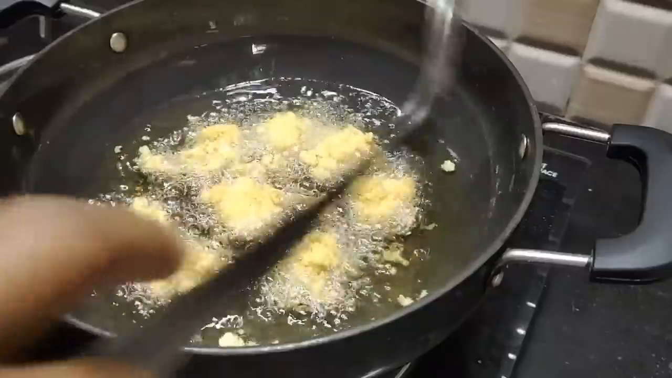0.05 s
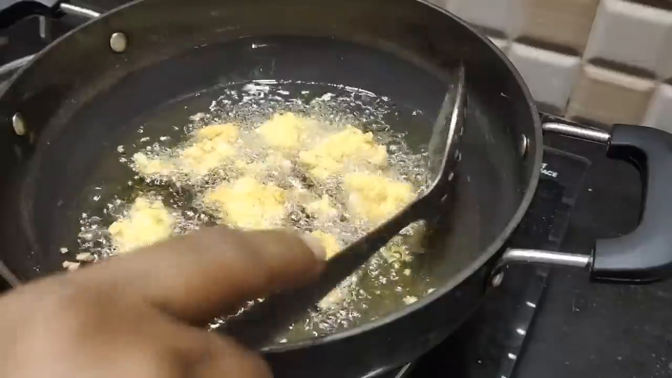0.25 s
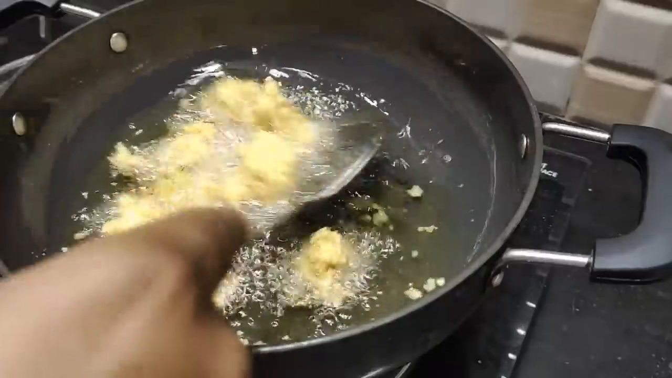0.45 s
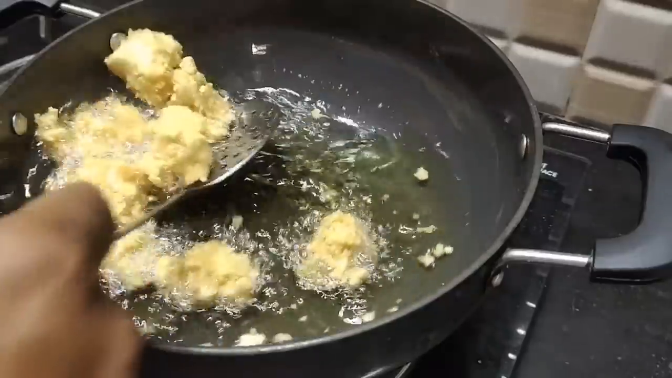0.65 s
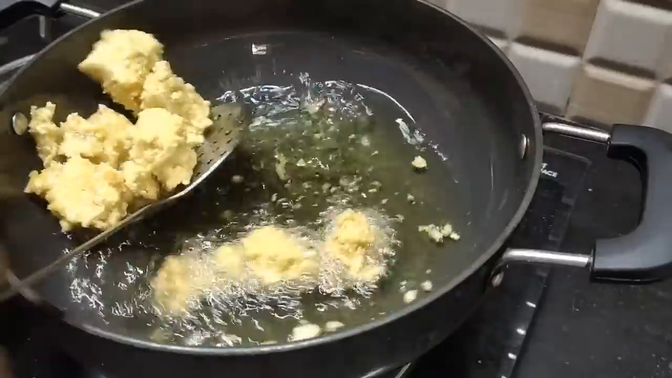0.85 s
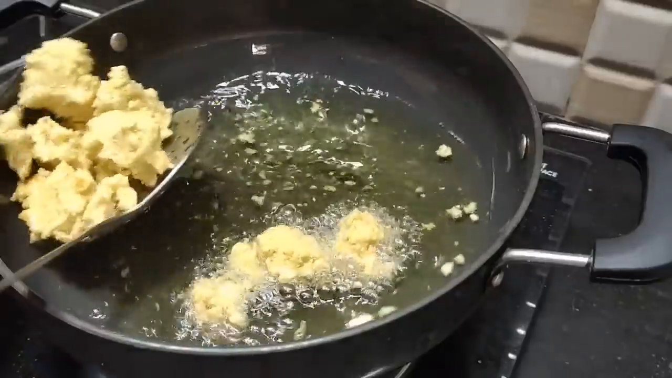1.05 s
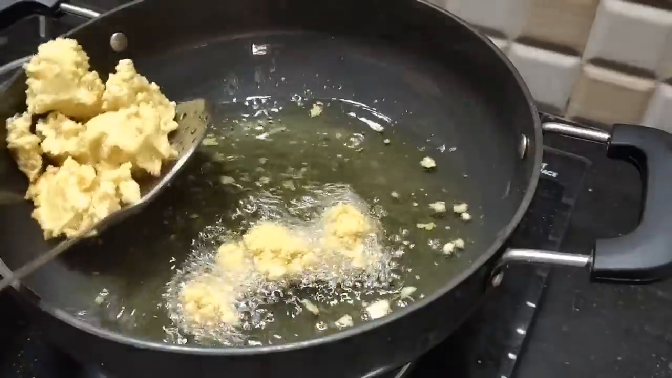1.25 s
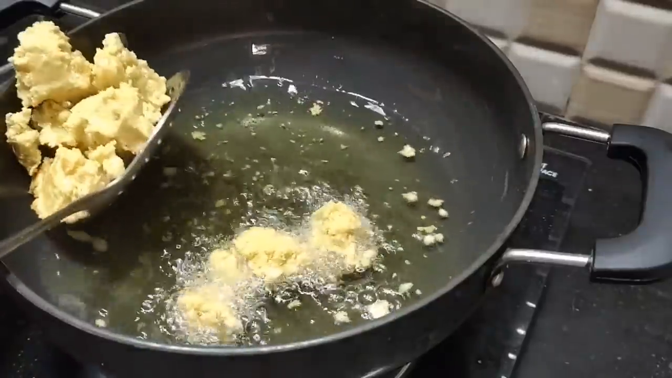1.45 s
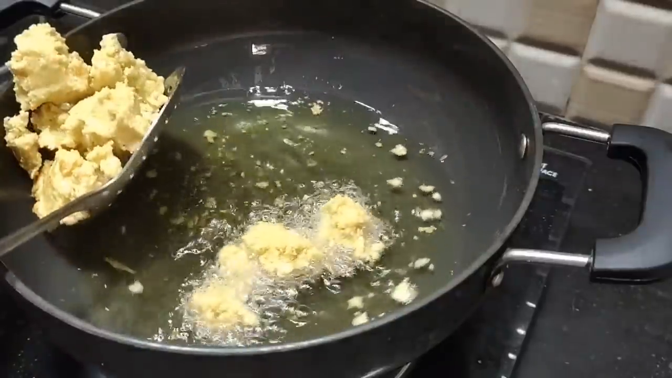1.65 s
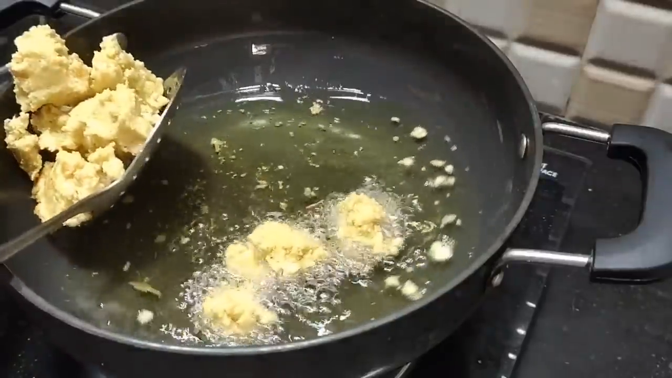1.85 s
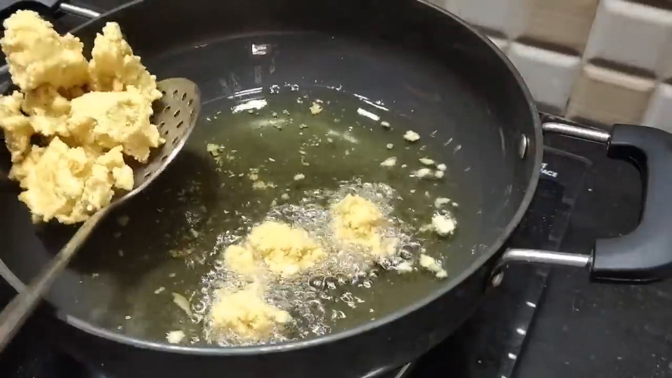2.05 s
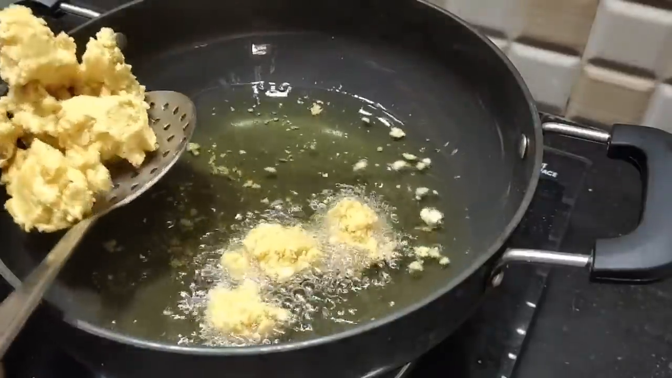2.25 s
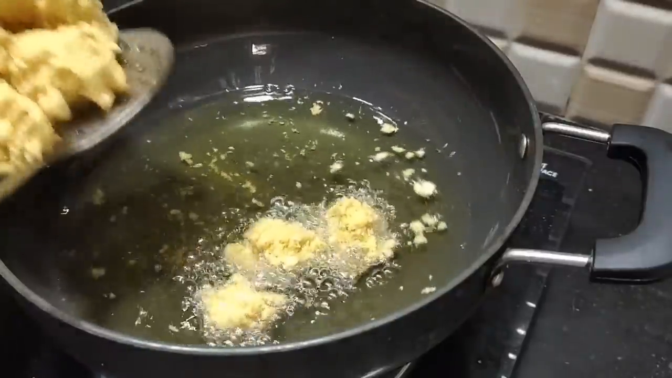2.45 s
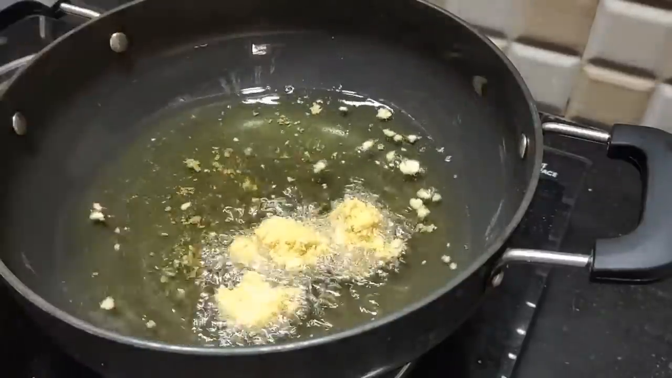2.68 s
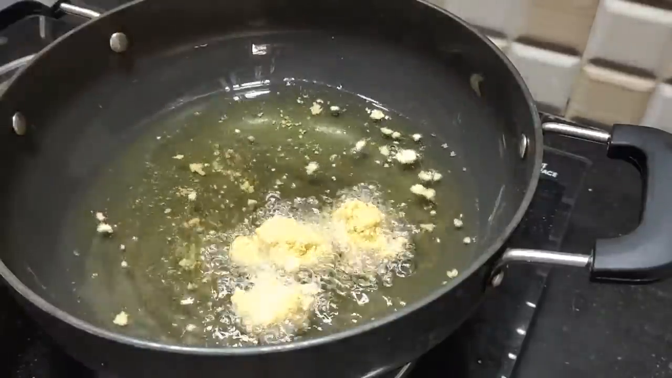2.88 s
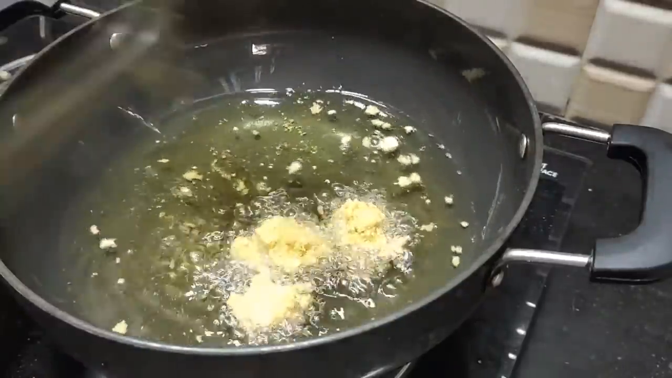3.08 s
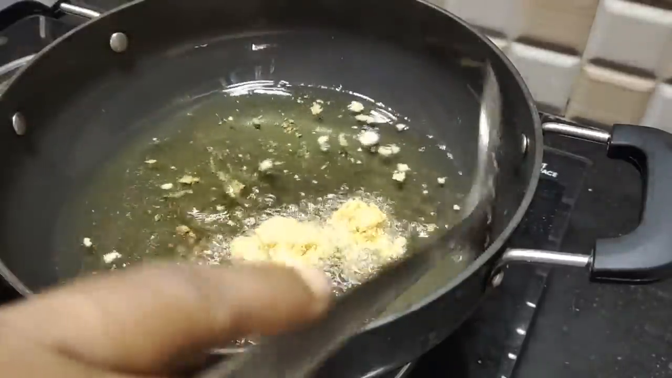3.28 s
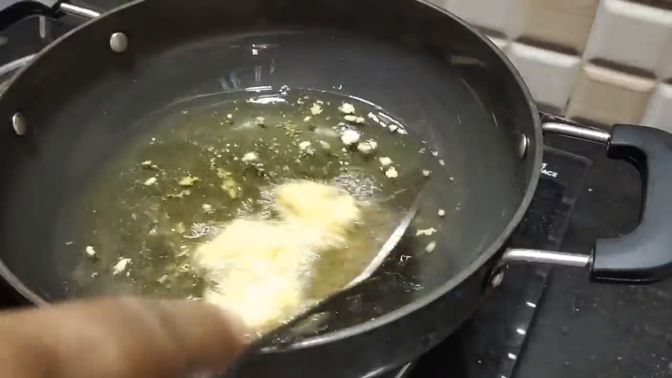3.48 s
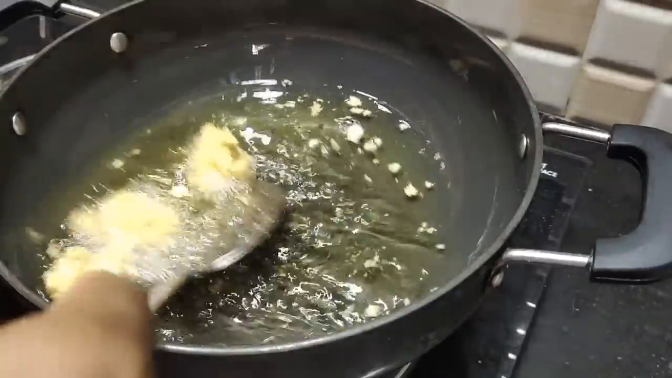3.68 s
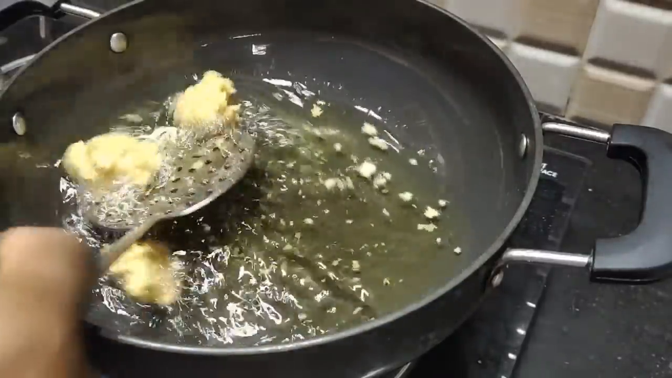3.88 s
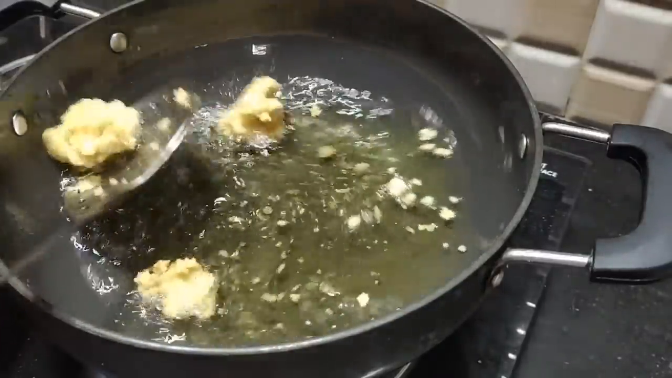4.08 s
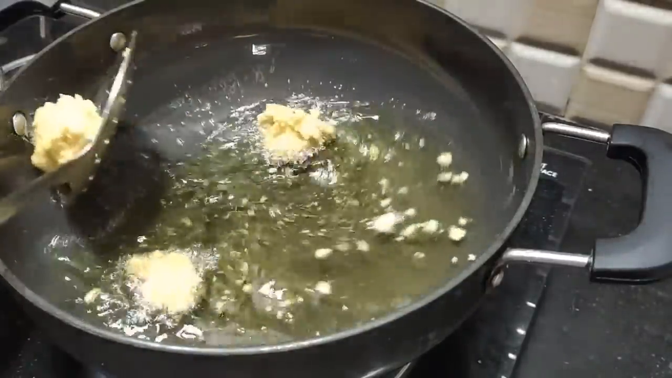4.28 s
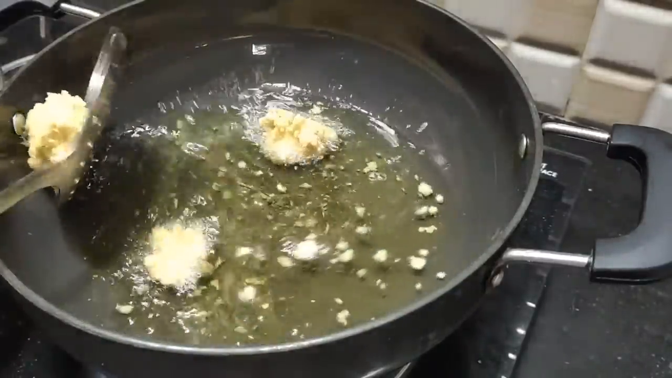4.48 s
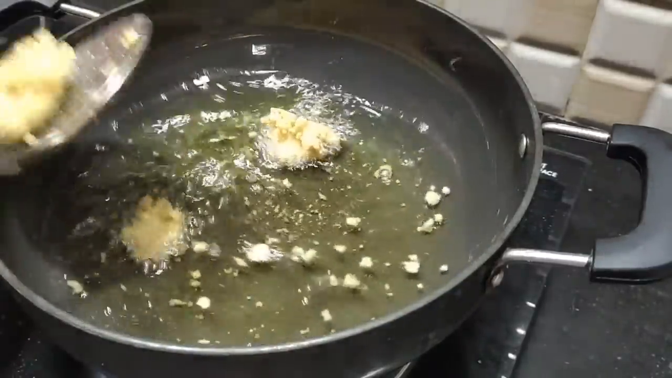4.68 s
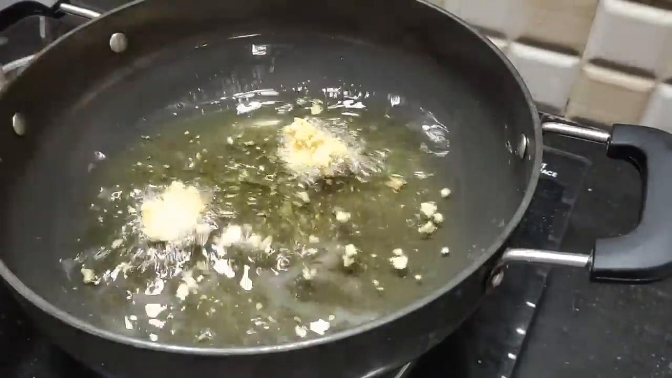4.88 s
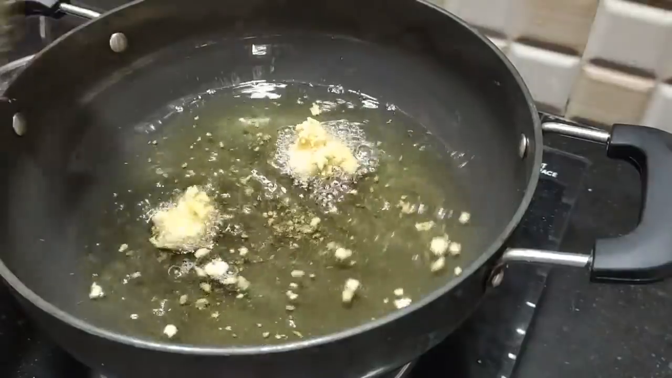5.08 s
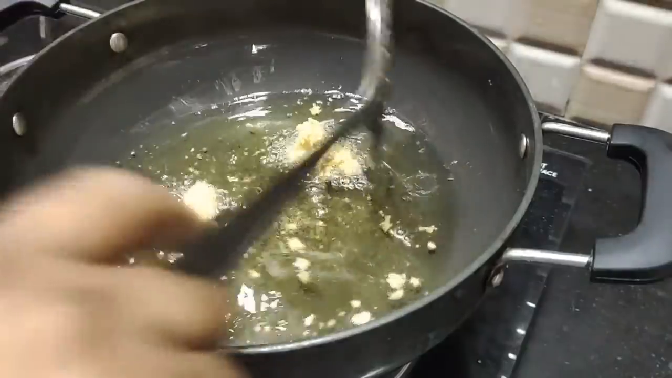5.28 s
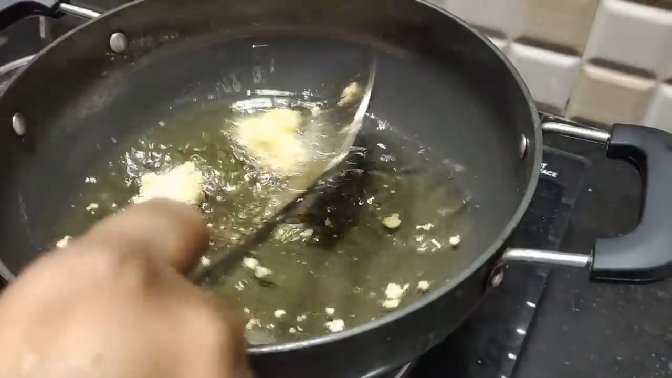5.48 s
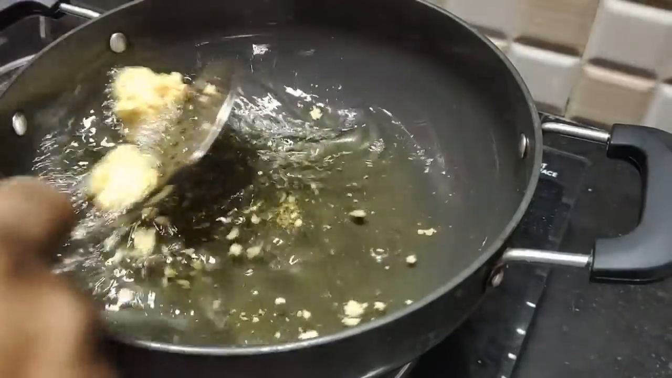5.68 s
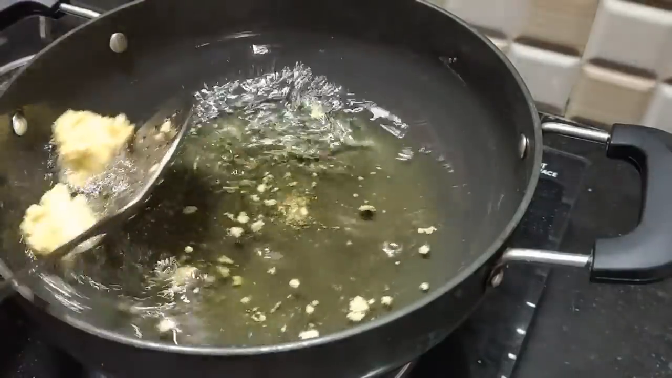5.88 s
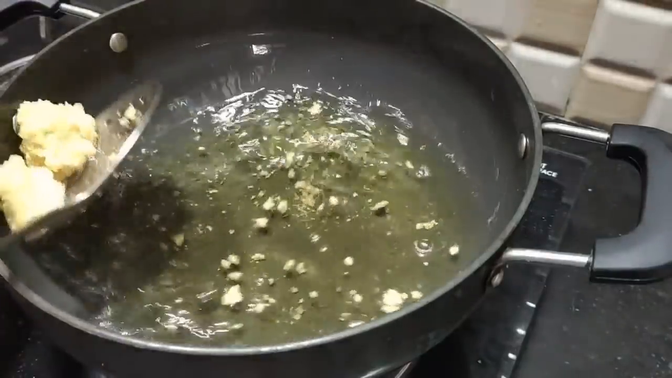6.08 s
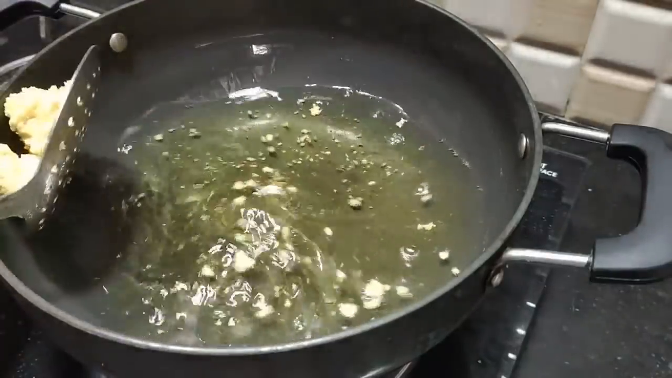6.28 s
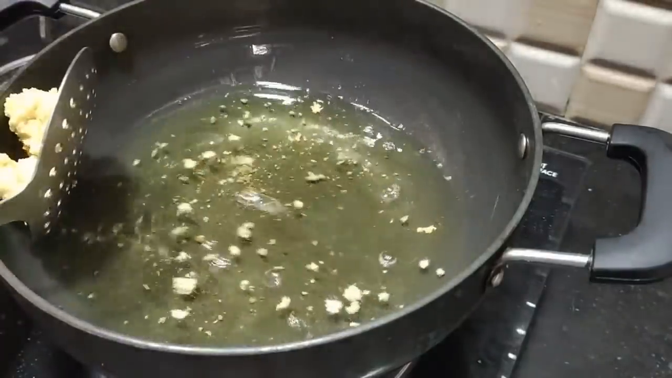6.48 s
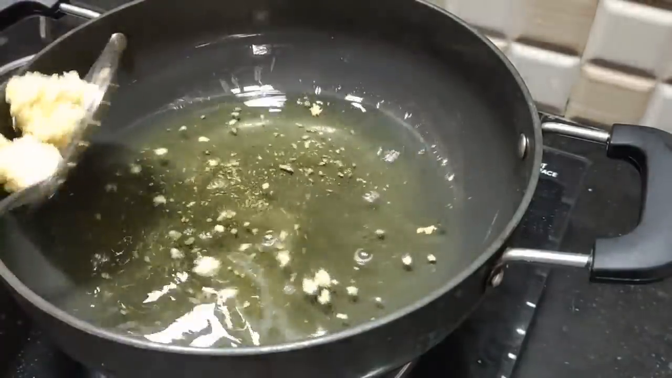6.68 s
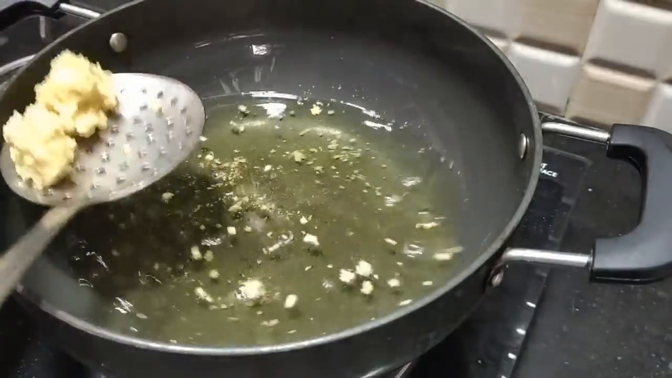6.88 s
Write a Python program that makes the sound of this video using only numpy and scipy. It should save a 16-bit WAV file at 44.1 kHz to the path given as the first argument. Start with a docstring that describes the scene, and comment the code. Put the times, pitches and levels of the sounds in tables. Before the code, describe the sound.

Irregular scrapes, judders and sharp clanks of a steel spoon in a pan of faintly sizzling oil.

```python
"""In a small tiled kitchen, a slotted steel spoon scoops fried food out of a nonstick pan of hot oil.
The spoon knocks on the pan and rings, grinds over the coating, and judders where it sticks and slips.
The pan booms under it, and tiny bursting steam bubbles make the oil sizzle faintly.
The hard walls give these sounds a short echo, over a low, steady hush."""
import sys
import numpy as np
from scipy import signal
from scipy.fft import rfft, irfft
from scipy.io import wavfile
from scipy.ndimage import uniform_filter1d

SR = 44100
rng = np.random.default_rng(int(sys.argv[2]) if len(sys.argv) > 2 else 0)


def master_out(mix):
    """Clip the mix to full scale and print it as 16-bit PCM to the path in sys.argv[1]."""
    frames = np.transpose(np.atleast_2d(mix))
    ceiling = np.clip(frames, -1, 1)
    pcm = np.round(ceiling * 32767).astype(np.int16)
    wavfile.write(sys.argv[1], SR, pcm)


N = 306054
T = np.arange(N) / SR

# The spoon's ringing tones. Each row: pitch in Hz, level in dB, seconds to fade by 60 dB before
# damping, left over right in dB.
SPOON_TONES = [(722, -17, .3, 0), (860, -23, .25, 0), (1140, -23, .22, 0), (1870, -12, .22, -1),
               (1948, -10, .3, -1), (2398, -14, .15, 0), (2650, -17, .18, 0), (3435, -19, .22, 0),
               (3740, -14, .3, 0), (4340, -20, .22, 0), (4690, -24, .3, 0), (5050, -15, .25, 8),
               (5085, -12, .25, 10), (5420, -17, .17, 4), (6320, -17, .25, 0), (7117, 2, .18, -4),
               (7168, -5, .26, -3), (7600, -11, .3, 0), (7760, -17, .18, 0), (8366, -5, .12, -2),
               (8915, -21, .25, 0), (9770, -15, .18, 0), (10020, -12, .2, 0), (10660, -16, .25, 2),
               (11400, -25, .2, 2), (12625, -9, .17, 9), (12980, -15, .22, 6), (13870, -23, .25, 3)]
# Pushes of the spoon over the coating. Each row: start in seconds, length in seconds, level in dB,
# its change by the end in dB, treble bite in dB, pan boom in dB, contact pitch in Hz, its lift in dB.
PUSHES = [(0.029, 0.088, -31, -3, -1.5, 10.5, 2440, -3.5),
          (0.314, 0.34, -61.5, -0.5, -26.5, 8, 2100, -28.5), (0.579, 0.13, -42.5, 6, -3, -3, 2850, 4.5),
          (0.716, 0.33, -57.5, -4.5, -34, 4.5, 2330, 6.5), (1.87, 0.093, -44, -0.5, -15.5, -4.5, 2110, 7),
          (2.005, 0.38, -49.5, -9.5, -26, 1.5, 1940, -4), (2.314, 0.1, -37.5, -12.5, -0.5, -14, 1960, 8.5),
          (2.666, 0.13, -31.5, -7.5, -3, 2, 2360, -1.5), (2.793, 0.069, -26, -13, -0.5, 2.5, 2430, -1.5),
          (2.882, 0.17, -39.5, -6.5, -26, -18, 2250, -8), (3.098, 0.15, -37, -23.5, -18, -13.5, 2220, -5),
          (3.454, 0.14, -28.5, -8.5, -5, -1.5, 2180, 0.5), (3.614, 0.11, -57.5, -5, -16, -11.5, 1960, 15),
          (4.033, 0.016, -51, -2.5, -24, 8, 2040, 5), (4.185, 0.1, -52, -4, -7.5, 9.5, 1780, 2),
          (4.389, 0.25, -50.5, 5.5, -10.5, -3.5, 1830, 6), (4.788, 0.13, -43, -0.5, -12, 4, 2500, 0),
          (4.968, 0.11, -49.5, -1.5, -13, 6.5, 2140, -29.5),
          (5.155, 0.21, -42, -12.5, -11, 12.5, 2710, -0.5), (5.643, 0.094, -39, -4.5, -10.5, -13, 2910, -2),
          (5.751, 0.3, -45.5, -3.5, -25, 1.5, 1910, -11.5), (6.335, 0.11, -53, 5, -26, 2, 1910, -14),
          (6.37, 0.17, -40, -12.5, -12, -14, 2640, 3), (6.538, 0.12, -52, 0.5, -12.5, -6, 1830, 11)]


def knocks(level_db=-6, ring_db=9, clank_db=3, boom_db=17, crack_s=0.008, attack_s=0.0023):
    """Each blow on the pan gives a crack, a short clank, a low boom and the ring of the spoon."""
    # Each row: start in seconds, level in dB, clank in dB, hard edge in dB, ring in dB, left over right
    # in dB, clank pitch in Hz, seconds for the clank to fade by 60 dB, favoured spoon pitch in Hz.
    blows = [(0.227, -30, -0.5, -11.5, -8.5, 1, 2650, 0.18, 2400),
             (1.3418, -48.5, 1.5, -22.5, -16, 0.5, 2070, 0.25, 1840),
             (2.0891, -48.5, 11.5, -8, 4, 0.5, 1910, 0.078, 5085),
             (2.25, -48, 5.5, -12, -8.5, -4, 1850, 0.36, 2650),
             (2.3028, -37, 0.5, -25, -7, -0.5, 1800, 0.12, 1890),
             (2.389, -40.5, -3, -75, -3.5, 5, 1940, 0.094, 1948),
             (2.6914, -19, -9, -10.5, -9.5, -2, 2950, 0.32, 10020),
             (3.02, -38.5, -10, -23, -13, 3, 2236, 0.097, 5200),
             (3.11, -40.5, -4.5, -22, -21, 0, 2010, 0.06, 2630),
             (3.1286, -31, -29, -20.5, -27, 8.5, 1850, 0.068, 5085),
             (3.24, -20, -15.5, -1, -8, -0.5, 1690, 0.11, 3740),
             (3.2539, -19, -12, -18.5, -4, 1.5, 2430, 0.38, 5000),
             (4.405, -59, 13.5, -20, -10, 4, 1826, 0.09, 1920),
             (4.567, -13.5, -8.5, -8.5, -4, -4, 2060, 0.075, 5400),
             (4.634, -9.5, -13, -19.5, -17.5, 1.5, 1883, 0.096, 3740),
             (4.9823, -43.5, 1.5, -14, -10.5, -7, 2850, 0.025, 5200),
             (5.3369, -11.5, -1.5, -11.5, -17.5, -1.5, 2413, 0.042, 720),
             (6.3317, -62, 19, -17, -24, 4, 1950, 0.075, 1900),
             (6.5604, -54, 16, -6, -14, -1.5, 2420, 0.16, 1900),
             (6.7144, -27, -10.5, -17, -2.5, 0, 2030, 0.24, 1930)]
    # The pan's clank. Each row: frequency in Hz, level in dB.
    clank_spectrum = [(35, -61), (60, -32), (193, -12.5), (308, -1.5), (398, 1.5), (715, 4.5), (1620, -4),
                      (1910, -1.5), (2140, -7), (2350, 2), (5590, -20), (7400, -9), (10800, -9),
                      (13000, -11.5), (16000, -20.5)]
    out, force, t = np.zeros((2, N)), np.zeros(N), T[:SR // 3]
    for start, db, clank, edge, ring, side, hz, fade_s, favoured_hz in blows:
        noise = rng.standard_normal((2, len(t)))
        body, treble, top = three_bands(colour(noise, clank_spectrum, ripple_db=2), 4230, 8750)
        body = body + amp(-8) * resonate(noise, hz, width_hz=560)
        fall = amp(-60 * t / fade_s) + np.exp(-t / crack_s)
        hit = fall * (amp(clank + clank_db) * body + amp(-3) * treble + amp(edge + 3) * top)
        # the spot that is struck lifts nearby tones by up to 5 dB
        octaves_away = np.log2(np.transpose(SPOON_TONES)[0] / favoured_hz)
        weights = amp(5 * np.exp(-(octaves_away / 0.24) ** 2))
        hit += amp(ring + ring_db) * spoon_ring(weights, damping=2.17)
        hit *= 1 - np.exp(-t / attack_s)  # the blow takes a moment to spread through the metal
        add(out, start - .001, amp(db + level_db) * balance(side) * hit)
        add(force, start, amp(db + clank + boom_db) * np.hanning(20))
    return out + pan_boom(force)


def scrapes(grind_db=-0.5, contact_db=-7.5, rasp_db=-2, top_db=-15, ring_db=-9, hard_bite_db=-38):
    """The spoon's edge catches on grains of the coating; each catch rattles the pan and rings the spoon."""
    catches = clicks(per_s=1800, spread_db=4) * amp(1.5 * wobble(500))
    # the point of contact travels, so the pan's many tones take turns
    rattle = flutter(scatter(catches, fade_s=0.023), depth_db=6, frames=12, bins=2)
    out = np.zeros((2, N))
    for start, length, db, change, bite, _, contact_hz, lift in PUSHES:
        pressure = amp(db) * push(start, length, change)
        span = (round(start * SR) + np.arange(len(pressure))) % N
        # each push holds the spoon differently, so other tones stand out
        weights = amp(2.8 * rng.standard_normal(len(SPOON_TONES)))
        weights *= (2000 / np.transpose(SPOON_TONES)[0]) ** 1.5
        ring = spoon_ring(weights, damping=3.2)
        ringing = unit(signal.fftconvolve(catches[None, span], ring, axes=1)[:, :len(span)])
        # The grinding. Each row: frequency in Hz, level in dB.
        grind_spectrum = [(59, -68.5), (100, -41.5), (206, -40), (266, -36), (442, -9), (872, -6),
                          (1390, -8.5), (1910, -20.5), (2130, -49.5), (2860, -15), (6020, -29.5),
                          (7450, -22), (13200, -53), (15000, -47.5), (16000, -59)]
        metal = colour(rattle[:, span], grind_spectrum, ripple_db=-0.5) + amp(ring_db) * ringing
        _, rasp, top = three_bands(metal, 4500, 9140)
        body = three_bands(metal, 1.86 * contact_hz, 9000)[0]  # a soft contact passes little treble
        contact = resonate(rattle[:, span], contact_hz, width_hz=680)
        body = amp(grind_db) * body + amp(contact_db + lift) * contact
        highest_db = bite + top_db + 0.57 * (db + bite - hard_bite_db)  # a harder bite is brighter
        add(out, start, pressure * (body + amp(bite + rasp_db) * rasp + amp(highest_db) * top))
    # cuts the deep bass below 150 Hz out of the scraping
    return signal.sosfilt(signal.butter(2, 150, "highpass", fs=SR, output="sos"), out)


def judders(level_db=-1.5, overtone_db=-28, pan_db=-8, drag_db=-7, thud_db=-21, waver=0.028):
    """The spoon sticks and slips, shaking pan and stove in bursts over the low rumble of dragging."""
    # Each row: time in seconds, level in dB, slips per second, length in seconds.
    bursts = [(0.049, -9, 275, 0.048), (0.114, -24.5, 298, 0.13), (0.192, -31, 294, 0.072),
              (0.583, -28, 316, 0.054), (0.615, -22, 294, 0.023), (0.656, -20, 269, 0.054),
              (2.696, -33, 284, 0.098), (2.809, -31.5, 315.6, 0.03), (3.257, -32, 332, 0.071),
              (3.414, -43, 299.5, 0.1), (3.516, -28.5, 305, 0.031), (4.263, -27, 272, 0.046),
              (4.565, -24.5, 300, 0.089), (4.847, -38.5, 289, 0.057), (5.028, -47, 335, 0.04),
              (5.181, -29, 278, 0.05), (5.236, -20.5, 283, 0.055), (5.304, -32.5, 292, 0.076),
              (5.669, -25.5, 271, 0.056), (5.773, -32.5, 276, 0.044), (5.885, -29.5, 271, 0.048),
              (6.259, -37, 300, 0.059)]
    # Each pair: frequency in Hz, level in dB.
    rumble_spectrum = [(30, -36), (60, -9), (110, -2.5), (180, -8), (260, 4), (330, 6.5), (420, -4),
                       (900, 1.5), (2000, -55.5)]
    thud_spectrum = [(25, -34.5), (70, -15.5), (105, 5), (170, 2), (230, -15), (400, 6.5), (700, 7.5),
                     (1000, -7.5), (2000, -45)]
    strength = np.zeros(N)
    for time, db, _, length in bursts:
        add(strength, time + 0.011 - length / 2, amp(db + level_db) * np.hanning(int(length * SR)))
    times, _, slip_hz, _ = np.transpose(bursts)
    rate = np.interp(T, times, slip_hz) * (1 + waver * wobble(400))
    phase = 2 * np.pi * np.cumsum(rate) / SR
    shake = strength * (np.sin(phase) + amp(overtone_db) * np.sin(2 * phase))
    rumble = unit(pan_boom(colour(rng.standard_normal(N), rumble_spectrum)))
    rumble *= amp(drag_db) * drag()
    # uneven slips also give a dull thud that lingers in the stove
    linger = np.exp(-T[:SR // 3] / 0.012)
    thud = colour(rng.standard_normal(N), thud_spectrum)
    thud *= amp(thud_db) * signal.oaconvolve(strength, linger / linger.sum())[:N]
    return (shake + amp(pan_db) * pan_boom(shake) + rumble + thud) * amp([[-1.7], [1.5]])


def push(start, length, change_db):
    """The pressure of one scrape builds, drifts and lets go."""
    t = start + T[:round((length + .12) * SR)]
    return swell(t, start, length, attack_s=0.032, release_s=0.028, change_db=change_db)


def drag():
    """The force on the pan: the weight of the loaded spoon, plus every push."""
    # The leaning spoon. Each row: time in seconds, rumble level in dB.
    lean = [(0, -37.5), (.5, -60), (1.3, -58), (1.6, -80.5), (2.6, -90), (3.2, -62), (3.9, -54.5),
            (4.35, -49), (5.55, -52), (6.25, -50), (6.94, -53.5)]
    force = amp(np.interp(T, *np.transpose(lean)))
    for start, length, db, change, _, boom, _, _ in PUSHES:
        add(force, start, amp(db + boom) * push(start, length, change))
    return force


def spoon_ring(weights, damping):
    """The steel rings with many tones at once; touching the pan damps them, so they fade sooner."""
    t = T[:SR // 3]
    phases = rng.random((len(SPOON_TONES), 1, 1)) + .3 * rng.random((len(SPOON_TONES), 2, 1))
    ring = np.zeros((2, len(t)))
    for (hz, db, fade_s, side), weight, phase in zip(SPOON_TONES, weights, phases):
        fall = amp(db - 60 * t * damping / fade_s)
        ring += weight * balance(side) * fall * np.sin(2 * np.pi * (hz * t + phase))
    return ring


def pan_boom(force):
    """A force sets the pan's low tones ringing."""
    # Each row: pitch in Hz, width in Hz, level in dB.
    pan_tones = [(287, 8.7, -7), (285.8, 9.8, -19), (323.7, 23, -1.5), (469.5, 21, -9), (712, 8.3, -17.5)]
    return sum(amp(db) * signal.lfilter(*signal.iirpeak(hz, hz / width, SR), force)
               for hz, width, db in pan_tones)


def oil(level_db=-9, pops_db=-7, simmer_db=-60):
    """Tiny steam bubbles burst among a few larger pops; the oil boils up when stirred, then settles."""
    # Each row: start in seconds, length in seconds, level in dB.
    stirs = [(1.88, 0.32, -59), (3.967, 0.26, -47), (4.449, 0.13, -38.5), (4.975, 0.16, -49),
             (5.85, 0.057, -53), (6.135, 0.11, -53.5), (6.556, 0.1, -51.5)]
    # The sizzle. Each row: frequency in Hz, level in dB.
    sizzle_spectrum = [(300, -16), (1500, -22), (4500, -16.5), (6500, -8), (8200, 1), (9500, -11),
                       (11500, -11.5), (13500, -10), (16000, -15.5)]
    fizz = scatter(clicks(per_s=6000, spread_db=1.8), fade_s=0.082)
    fizz = flutter(colour(fizz, sizzle_spectrum), depth_db=5)
    pops = scatter(clicks(per_s=70, spread_db=3), fade_s=0.042)
    pops = flutter(colour(pops, sizzle_spectrum), depth_db=8.5)
    stirred = sum(amp(db) * swell(T, start, length, attack_s=0.085, release_s=0.064)
                  for start, length, db in stirs)
    return (fizz + amp(pops_db) * pops) * amp(level_db) * (amp(simmer_db) + stirred)


def scatter(x, fade_s):
    """Quick echoes inside the pan reach left and right by different paths."""
    t = T[:2048]
    paths = rng.standard_normal((2, len(t))) * amp(-60 * t / fade_s)
    paths /= np.linalg.norm(paths, axis=1, keepdims=True)
    return signal.oaconvolve(x[None], paths, axes=1)[:, :N]


def kitchen(x, echo_db):
    """Hard walls add a dense tail of echoes that dies sooner in the treble."""
    # Each row: frequency in Hz, seconds to fade by 60 dB.
    fade_times = [(100, 1), (300, 0.48), (1000, 0.52), (2500, 0.46), (7000, 0.39), (14000, 0.38)]
    echoes = rng.standard_normal((2, SR)) * (rng.random((2, SR)) < .15)
    hz, t, bands = signal.stft(echoes, SR, nperseg=256)
    alike = .95 / (1 + (hz[:, None] / 650) ** 4)  # left and right nearly match in the bass
    bands[1] = alike * bands[0] + np.sqrt(1 - alike ** 2) * bands[1]
    bands *= amp(-60 * t / look_up(fade_times, hz)[:, None])
    tail = signal.istft(bands, SR, nperseg=256)[1][:, :SR]
    tail *= 1 - np.exp(-(T[:SR] / 0.0018) ** 2)  # the first echoes take a moment to arrive
    return x + amp(echo_db) * signal.fftconvolve(x, tail / np.linalg.norm(tail[0]), axes=1)[:, :N]


def hush(level_db=-83):
    """The low, steady background of the kitchen."""
    # Each row: frequency in Hz, level in dB.
    hush_spectrum = [(15, -58.5), (25, -23), (60, -24.5), (93, -1.5), (205, -29), (320, -20), (617, -24.5),
                     (831, -3), (1030, -28.5), (2730, -16), (4000, -20.5), (5200, -56.5), (8800, -120)]
    left, right, both = rng.standard_normal((3, N))
    return amp(level_db) * colour(np.array([left, right]) + 0.82 * both, hush_spectrum)


def amp(db):
    """Turns decibels into a gain."""
    return 10 ** (np.asarray(db) / 20)


def unit(x):
    """Scales a sound to an average (rms) level of 1."""
    return x / np.sqrt(np.mean(x ** 2) + 1e-20)


def balance(side_db):
    """Two gains that make the left side_db louder than the right."""
    return amp([[side_db / 2], [-side_db / 2]])


def look_up(table, hz):
    """Reads between a table's rows on a pitch-like (log) scale."""
    row_hz, values = np.transpose(table)
    return np.interp(np.log(hz + 1), np.log(row_hz + 1), values)


def add(mix, start_s, sound):
    """Mixes a sound in at its start time."""
    part = mix[..., max(round(start_s * SR), 0):][..., :sound.shape[-1]]
    part += sound[..., :part.shape[-1]]


def colour(x, spectrum, ripple_db=0, spacing_hz=70):
    """Shapes a sound's spectrum; the random ripple stands for the metal's many weak tones."""
    size = x.shape[-1]
    hz = np.fft.rfftfreq(size, 1 / SR)
    ripple = np.interp(hz / spacing_hz, np.arange(512), rng.standard_normal(512))
    return unit(irfft(rfft(x) * amp(look_up(spectrum, hz) + ripple_db * ripple), size))


def three_bands(x, low_hz, high_hz):
    """Splits a sound into body, treble and top, each at level 1."""
    size = x.shape[-1]
    hz = np.fft.rfftfreq(size, 1 / SR)
    body = 1 / (1 + (hz / low_hz) ** 8)
    below_top = 1 / (1 + (hz / high_hz) ** 24)
    return [unit(irfft(rfft(x) * share, size)) for share in (body, below_top - body, 1 - below_top)]


def resonate(x, hz, width_hz):
    """Keeps the part of a sound around one pitch, at level 1."""
    turn = np.exp(2j * np.pi * hz * T[:x.shape[-1]])
    decay = np.exp(-np.pi * width_hz / SR)
    return unit((turn * signal.lfilter([1], [1, -2 * decay, decay ** 2], x / turn)).real)


def clicks(per_s, spread_db):
    """Random clicks, mostly small with a few large ones."""
    size = amp(spread_db * np.minimum(rng.exponential(1, N), 4))
    return size * rng.choice([-1, 1], N) * (rng.random(N) < per_s / SR)


def wobble(samples):
    """A random drift, smoothed over this many samples."""
    return unit(uniform_filter1d(rng.standard_normal(N), samples))


def flutter(x, depth_db, frames=9, bins=5):
    """Lets random patches of the spectrum swell and fade."""
    bands = signal.stft(x, SR, nperseg=512, noverlap=384)[2]
    patches = uniform_filter1d(rng.standard_normal(bands.shape[1:]), bins, axis=0)
    patches = uniform_filter1d(patches, 2 * frames, axis=1)
    bands *= amp(depth_db * unit(patches))
    return unit(signal.istft(bands, SR, nperseg=512, noverlap=384)[1][:, :N])


def swell(t, start, length, attack_s, release_s, change_db=0):
    """A level that rises, holds while drifting by change_db, then dies away."""
    age = t - start
    held = amp(change_db * np.clip(age / length, 0, 1))
    return np.clip(age / attack_s, 0, 1) * held * np.exp(-np.maximum(age - length, 0) / release_s)


def scene():
    """Spoon, pan and oil in the kitchen."""
    return (kitchen(knocks(), echo_db=-3.5) + kitchen(scrapes(), echo_db=-6.5)
            + kitchen(oil(), echo_db=-4.5) + kitchen(judders(), echo_db=-10) + hush())


def record(dry, cutoff_hz=15700):
    """Cuts off the very highest treble."""
    lowpass = signal.firwin(151, cutoff_hz, window=("kaiser", 9), fs=SR)
    return signal.oaconvolve(dry, lowpass[None], "same")


dry = scene()
out = record(dry)
master_out(out)
```